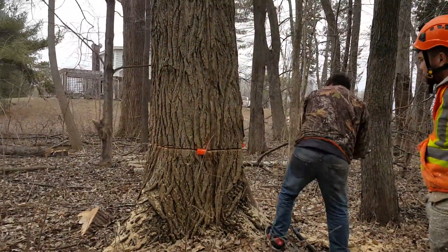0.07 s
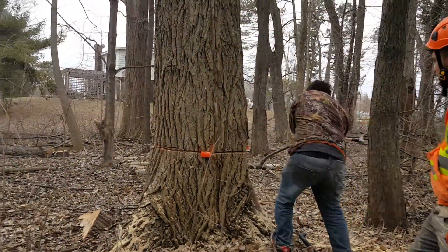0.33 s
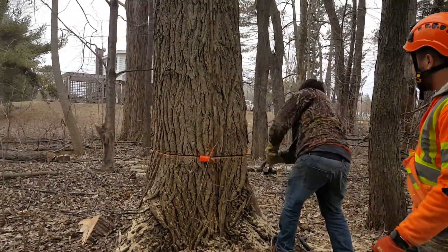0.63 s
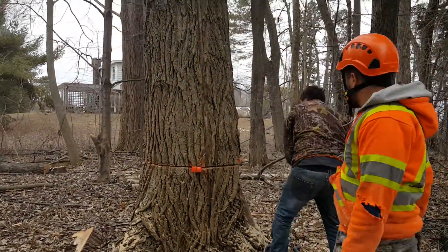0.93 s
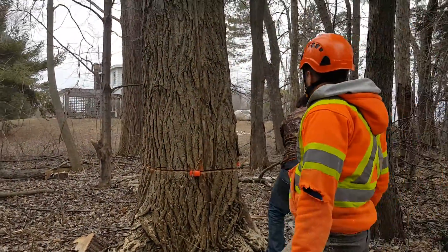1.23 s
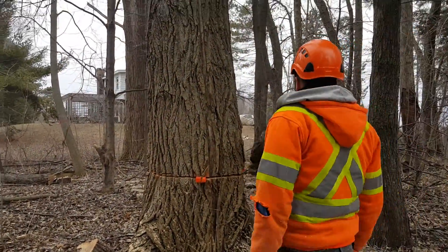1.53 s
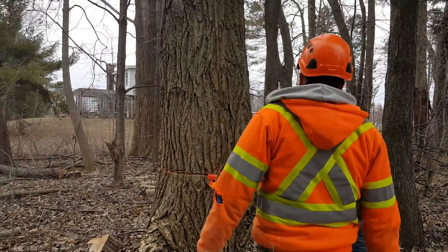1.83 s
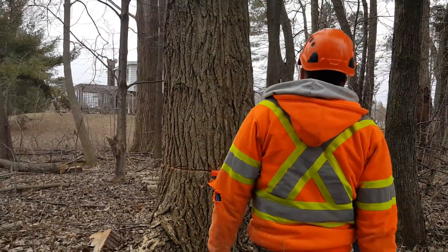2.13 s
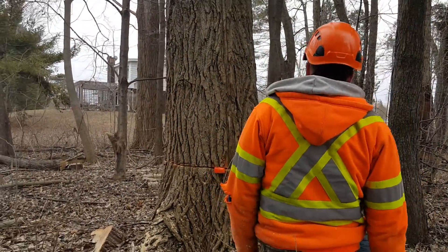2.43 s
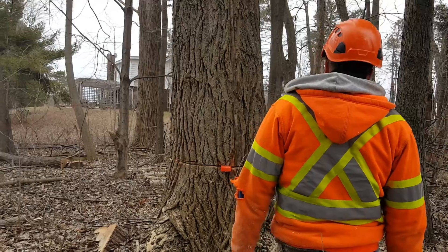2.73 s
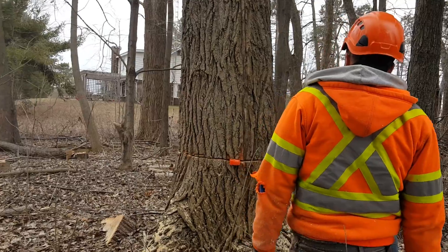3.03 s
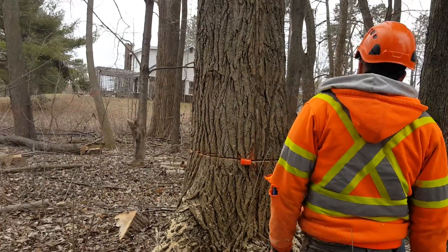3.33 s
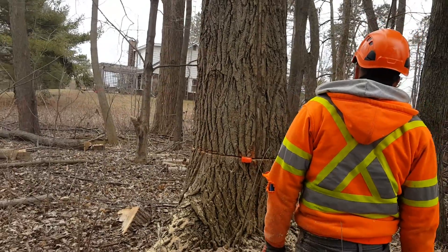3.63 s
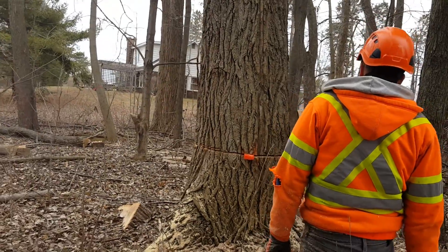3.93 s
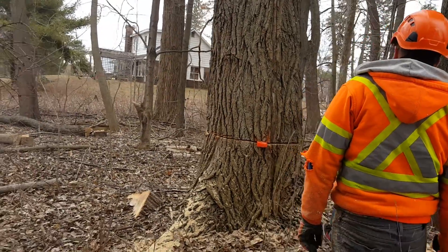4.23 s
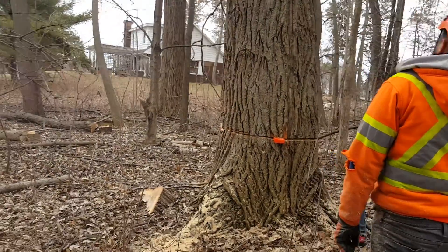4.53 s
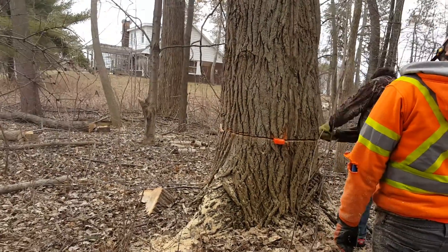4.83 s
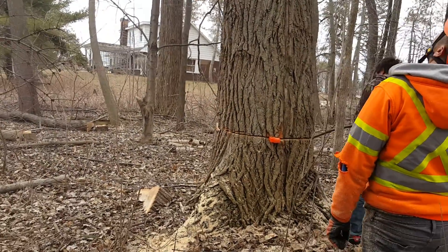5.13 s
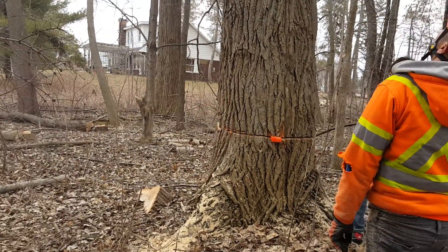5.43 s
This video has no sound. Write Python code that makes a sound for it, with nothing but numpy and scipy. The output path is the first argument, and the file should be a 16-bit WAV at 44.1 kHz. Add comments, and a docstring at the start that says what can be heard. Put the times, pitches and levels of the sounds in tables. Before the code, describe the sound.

A sledgehammer drives a wedge into a big tree with five evenly paced blows, about one a second, growing louder. Each is a sharp knock with a brief metallic ring and a short echo from the surrounding trees. Close to the stereo microphone, a jacket rubs, boots drag through dry leaves with soft low thuds, and twigs crack, mostly near the start. Faint outdoor air lies underneath.

```python
"""Five sledge blows drive a felling wedge into a big tree in a bare wood.
Each blow rings wedge and trunk briefly, overloads the stereo microphone and scatters back from the trees.
Close by, a man shifts about: his work jacket rubs, his boots drag dry leaves and land with a low rumble.
Twigs and crunching dry leaves give short, sharp cracks; the faint air of the wood lies under it all."""
import sys
import numpy as np
from scipy import signal
from scipy.fft import rfft, irfft
from scipy.io import wavfile

SR = 44100
rng = np.random.default_rng(int(sys.argv[2]) if len(sys.argv) > 2 else 0)


def master_out(mix):
    """Clip the mix to full scale and print it as 16-bit PCM to the path in sys.argv[1]."""
    frames = np.transpose(np.atleast_2d(mix))
    ceiling = np.clip(frames, -1, 1)
    pcm = np.round(ceiling * 32767).astype(np.int16)
    wavfile.write(sys.argv[1], SR, pcm)


N = 250488

# the man shifts his weight: (peak time [s], rise [s], fall [s], cloth level [dB], leaf level [dB])
MOVES = [(0.06, 0.16, 0.19, -33.5, -30), (0.16, 0.3, 0.56, -41.5, -47), (0.47, 0.28, 0.49, -36, -39),
         (0.535, 0.08, 0.074, -34.5, -55), (0.70, 0.13, 0.14, -36.5, -45), (0.86, 0.36, 0.32, -46, -37.5),
         (1.09, 0.62, 1, -45, -42), (1.42, 0.14, 0.13, -41, -37), (1.585, 0.14, 0.15, -33.5, -31.5),
         (2.65, 0.5, 0.17, -61, -53), (3.02, 0.45, 0.99, -55.5, -48.5), (3.31, 0.13, 0.49, -62, -50),
         (3.76, 0.49, 0.38, -48.5, -40.5), (4.19, 0.27, 0.21, -52, -45.5),
         (4.31, 0.44, 0.024, -55.5, -45.5), (4.53, 0.14, 0.45, -46.5, -42), (4.85, 0.32, 0.052, -33.5, -31),
         (5.15, 1, 0.77, -61.5, -61), (5.46, 0.42, 0.022, -59, -48.5), (5.515, 0.033, 0.15, -62, -55)]
# spectra of jacket, dragged leaves, ticking leaves, rumble and air: (frequency [Hz], level [dB])
JACKET_COLOUR = [(100, -8.5), (700, -2.5), (1700, -6.5), (3000, 0.5), (4300, -1.5), (6000, -1.5),
                 (7200, -1.5), (8500, 2.5), (10000, -9.5), (12500, -5), (16000, -13.5)]
LEAF_COLOUR = [(80, -12), (250, -6.5), (400, -5), (780, -0.5), (1050, -0.5), (1300, -2.5), (1850, -0.5),
               (2400, -3.5), (3300, -18), (8000, -30), (15000, -36)]
CRACKLE_COLOUR = [(200, -12.5), (1000, -3.5), (2200, 2), (5000, -3.5), (8500, -2.5), (10500, -10),
                  (15500, -5)]
RUMBLE_COLOUR = [(20, -7.5), (45, 0), (80, -1.5), (130, -8), (250, -22.5), (600, -28), (2000, -63.5)]
AIR_COLOUR = [(30, -9.5), (80, -7.5), (438, -4), (762, -2.5), (1300, -11.5), (1670, -11), (3050, -32.5),
              (7680, -37.5), (15000, -46)]
# boots landing softly on the forest floor: (time [s], level [dB])
FOOTFALLS = [(0.05, -48), (0.19, -42), (0.42, -52.5), (1.07, -54), (1.39, -49), (1.53, -59), (2.52, -53),
             (4.02, -58), (4.49, -58), (4.78, -66)]
# short, sharp cracks of twigs and crunching dry leaves: (time [s], level [dB], body below 600 Hz [dB],
# edge above 2.5 kHz [dB], left-right [dB], decay [s], ring [Hz])
LITTER_CRACKS = [(0.062, -12.5, -11, -2, -17, 0.0012, 1020), (0.176, -11.5, 5.5, 6.5, 0.5, 0.0014, 950),
                 (0.92, -15.5, 9, 8, 0.5, 0.0011, 972), (1.038, -18, 5, 3.5, 0, 0.0047, 920),
                 (1.502, -19, 9, 0.5, -9.5, 0.0019, 1450), (2.178, -43, -6, 9, -1, 0.001, 785),
                 (2.538, -33, 12, 8.5, 3, 0.0023, 973), (3.22, -14.5, 6.5, 3.5, -3.5, 0.0019, 950),
                 (3.305, -29, 7.5, 2, 1, 0.0025, 1020), (5.135, -25, -2, 0, -2.5, 0.0019, 859),
                 (5.37, -19, -5, 4, 2.5, 0.0023, 1830)]
# spectrum of those cracks: (frequency [Hz], level [dB])
LITTER_CRACK_COLOUR = [(80, -15), (240, 1), (500, -1.5), (900, 3), (1900, 6), (3000, -10), (4200, -6),
                       (6000, -12.5), (8500, -9), (10500, -18), (15500, -8)]
# sledge blows: (time [s], strength [dB], scatter hold [s], favoured resonance [Hz], its lift [dB],
# hollow knock [dB])
BLOWS = [(0.6014, -4.5, 0.065, 1400, 7, 3.5), (1.6393, -1, 0.03, 1600, 4, -7.5),
         (2.7088, -0.5, 0.031, 850, 2, 4), (3.7965, 2, 0.022, 616, 2, 7), (4.9034, 3, 0.012, 1220, 3.5, 8)]
# modes of the trunk: (frequency [Hz], level [dB], t60 [s], left-right [dB])
TRUNK_MODES = [(127, -34, 0.22, 0), (214, -26.5, 0.18, -4), (267.3, -25.5, 0.11, 0.5),
               (399, -15, 0.02, -1.5), (573, -8, 0.025, 2.5)]
# hammer head and wedge, damped by the wood: (base frequency [Hz], level [dB], t60 [s], left-right [dB])
WEDGE_MODES = [(784, -4, 0.023, -0.5), (909, -3.5, 0.02, 7.5), (1193, 0, 0.012, 0),
               (1642, 2.5, 0.0099, 2.5), (1905, -5, 0.022, 0.5), (2128, -11, 0.018, 6),
               (3130, -26, 0.0035, -5), (4600, -19.5, .007, 7.5)]
# spectrum of the contact crack: (frequency [Hz], level [dB])
CONTACT_COLOUR = [(200, 3), (900, 3), (2000, 5), (3000, -5), (5000, -32), (8000, -32.5), (15000, -33.5)]
# scatter from nearby trunks and ground, and the far wood's murmur: (frequency [Hz], level [dB], t60 [s])
NEAR_WOOD = [(30, -40, 0.3), (70, -17.5, 0.3), (160, -7.5, 0.16), (214, -0.5, 0.22), (238, -6.5, .25),
             (288.5, -1, 0.62), (386, -20, 0.32), (696, 3, 0.22), (1400, -12.5, 0.17), (1950, -4, 0.31),
             (2400, -5, 0.3), (2720, -13.5, 0.32), (3330, -13.5, 0.31), (8800, -25.5, 0.21),
             (10700, -40, .24)]
FAR_WOOD = [(102.7, -32, 0.67), (280, -35, 0.74), (490, -30.5, 0.82), (692, -19.5, 1.07), (750, -19.5, 1.4),
            (827, -23.5, 1.52), (1240, -28.5, 1.16), (1770, -25, 1.16), (2420, -18, 0.54),
            (3200, -36, 0.92), (12130, -68, .5)]
# echoes dulled by rough bark: (delay [s], level [dB], left-right [dB], low edge [Hz], high edge [Hz])
BARK_ECHOES = [(.0092, -18.5, 0.5, 150, 5900), (0.0119, -17, 6.5, 298, 2520), (.0135, -25, -1.5, 398, 1374),
               (.0255, -23.5, -6, 406, 1103), (0.0355, -24.5, -7, 1500, 12230), (.056, -21, 8, 603, 2495),
               (.1205, -27.5, 3, 656, 1150)]
# likeness of the two microphones' signals: (frequency [Hz], coherence [0..1])
MIC_COHERENCE = [(30, 0), (120, 0.97), (280, 0.91), (550, 0.88), (1000, 0.38), (2000, 0.085), (4000, 0),
                 (15000, 0)]
# shading by the microphone housing: (frequency [Hz], left-right [dB])
HOUSING_SHADE = [(100, -1), (700, -1.5), (1150, 2), (1800, 4.5), (2600, 0), (3400, -6.5), (4400, -6),
                 (5600, -4), (8000, 0), (15000, 0)]


def amp(db):
    """Decibels to gain."""
    return 10 ** (np.asarray(db) / 20)


def unit(x):
    """Scales to rms 1."""
    return x / np.sqrt(np.mean(x ** 2) + 1e-20)


def read(points, hz, column=1):
    """One column of a table over log frequency."""
    table = np.transpose(points)
    return np.interp(np.log(hz + 1), np.log(table[0] + 1), table[column])


def pan(db):
    """Left and right gains for a level difference."""
    return amp(np.array([[db], [-db]]) / 2)


def add(mix, s, sound):
    """Lays a stereo sound into the mix."""
    part = mix[:, max(round(s * SR), 0):][:, :sound.shape[1]]
    part += sound[:, :part.shape[1]]


def mic_pair(pair):
    """Two unrelated signals become alike in the bass, as at two closely spaced microphones."""
    coherence = read(MIC_COHERENCE, np.fft.rfftfreq(pair.shape[1], 1 / SR))
    angle = np.arccos(np.clip(coherence, -1, 1)) / 2
    a, b = rfft(pair)
    mid, side = a * np.cos(angle), b * np.sin(angle)
    return irfft(np.array([mid + side, mid - side]), pair.shape[1])


def noise(size):
    """White noise at the microphone pair."""
    return mic_pair(rng.standard_normal((2, size)))


def colour(x, points, size=2048):
    """Causal filter of unit energy with the given spectrum."""
    log_gain = np.log(amp(read(points, abs(np.fft.fftfreq(size, 1 / SR)))))
    taps = np.fft.ifft(np.exp(np.conj(signal.hilbert(log_gain)))).real
    return signal.oaconvolve(x, taps[None] / np.linalg.norm(taps), axes=1)[:, :x.shape[1]]


def lift(x, hz, db, sharpness=5.4):
    """Raises or lowers one broad resonance."""
    return x + (amp(db) - 1) * signal.lfilter(*signal.iirpeak(hz, sharpness, fs=SR), x)


def drift(per_s):
    """Random wander of rms 1."""
    knots = rng.standard_normal(4096)
    return unit(np.interp(np.arange(N) / SR * per_s, np.arange(len(knots)), knots))


def swell(s, rise_s, fall_s, db, depth_db=24):
    """A gain that climbs depth_db in rise_s to its peak and drops as far in fall_s."""
    t = np.arange(N) / SR - s
    return amp(db - depth_db * np.minimum(np.maximum(-t / rise_s, t / fall_s), 10))


def movement():
    """Gains of jacket and leaves: overlapping moves add in power."""
    cloth = sum(swell(s, rise, fall, db) ** 2 for s, rise, fall, db, _ in MOVES)
    litter = sum(swell(s, rise, fall, db) ** 2 for s, rise, fall, _, db in MOVES)
    return np.sqrt(cloth), np.sqrt(litter)


def rustle(points, grains_per_s, grain_db, smooth, flutter_db, flutter_per_s):
    """Many tiny slips of uneven size over a smooth rub, coming in clumps."""
    slips = amp(grain_db * np.minimum(rng.exponential(1, N), 5)) * (rng.random(N) < grains_per_s / SR)
    grains = unit(slips * rng.standard_normal((2, N))) + smooth * rng.standard_normal((2, N))
    return unit(colour(mic_pair(grains) * amp(flutter_db * drift(flutter_per_s)), points))


def jacket(rub, cloth_db=2, side_db=1):
    """Stiff cloth slides on itself close to the microphone: a fine, nearly smooth hiss."""
    cloth = rustle(JACKET_COLOUR, grains_per_s=2700, grain_db=2, smooth=1,
                   flutter_db=1, flutter_per_s=130)
    return amp(cloth_db) * pan(side_db) * rub * cloth


def leaves(drag, leaves_db=-1, side_db=1):
    """Boots crush and drag the leaf litter close by."""
    crunch = rustle(LEAF_COLOUR, grains_per_s=1400, grain_db=0.5, smooth=0.93,
                    flutter_db=1.37, flutter_per_s=53)
    return amp(leaves_db) * pan(side_db) * drag * crunch


def crackle(drag, crackle_db=-55, follow=0.61, per_s=60, spread_db=1.5, tick_s=0.0019, size=900):
    """Single dry leaves tick at random, louder while boots drag them."""
    ticks = amp(spread_db * np.minimum(rng.exponential(1, N), 3)) * (rng.random(N) < per_s / SR)
    envelope = signal.oaconvolve(ticks, np.exp(-np.arange(size) / SR / tick_s))[:N] * drag ** follow
    bursts = mic_pair(envelope * rng.standard_normal((2, N)))
    return amp(crackle_db) * unit(colour(bursts, CRACKLE_COLOUR))


def ground_rumble(drag, rumble_db=3, lumps_db=2, rest_db=-68, drag_db=-22):
    """Lumpy low rumble, raised by footfalls and dragging boots."""
    steps = sum(swell(s, rise_s=0.15, fall_s=0.15, db=db) ** 2 for s, db in FOOTFALLS)
    weight = np.sqrt(steps + (amp(drag_db) * drag) ** 2 + amp(rest_db) ** 2)
    rumble = unit(colour(noise(N), RUMBLE_COLOUR) * amp(lumps_db * drift(per_s=50)))
    return amp(rumble_db) * weight * rumble


def still_air(air_db=-64):
    """The faint, steady hush of the wood all around."""
    return amp(air_db) * unit(colour(noise(N), AIR_COLOUR))


def litter_cracks(gain_db=1, settle_db=-24, settle_s=0.018, ring_db=8, peak_over_rms=4, size=5000):
    """Short, sharp cracks of twigs and crunching dry leaves ring briefly; the litter around settles."""
    out, t = np.zeros((2, N)), np.arange(size) / SR
    for s, db, body_db, edge_db, side_db, decay_s, ring_hz in LITTER_CRACKS:
        burst = noise(size) * (np.exp(-t / decay_s) + amp(settle_db) * np.exp(-t / settle_s))
        spectrum = [(hz, level + body_db * (hz < 600) + edge_db * (hz > 2500))
                    for hz, level in LITTER_CRACK_COLOUR]
        crack = colour(lift(burst, ring_hz, ring_db, sharpness=5.7), spectrum)
        peak = peak_over_rms * crack[:, t < .003].std()
        add(out, s + 0.001, amp(db + gain_db) * pan(side_db) * crack / peak)
    return out


def strike(pitch, thump_db, tilt_db_per_octave=-0.7, rise_s=0.0012,
           crack_db=-10.7, crack_s=0.005, push_db=-13, push_s=0.00072, size=8000):
    """Sledge on wedge: the modes ring with alternating sign; the contact adds a push and a crack."""
    t = np.arange(size) / SR
    modes = [(hz, db + thump_db, t60, side) for hz, db, t60, side in TRUNK_MODES]
    modes += [(hz * pitch, db + tilt_db_per_octave * np.log2(hz / 1000), t60, side)
              for hz, db, t60, side in WEDGE_MODES]
    ring, attack = np.zeros((2, size)), 1 - np.exp(-t / rise_s)
    for k, (hz, db, t60, side_db) in enumerate(modes):
        detune = 1 + .015 * rng.uniform(-1, 1)
        lag_s = rng.choice([-1, 1]) * np.array([[1], [-1]]) * 7e-5  # paths to the microphones differ
        tone = np.sin(2 * np.pi * hz * detune * (t - lag_s))
        ring += (-1) ** k * pan(side_db) * amp(db - 60 * t / t60) * tone
    crack = amp(crack_db) * colour(noise(size) * np.exp(-t / crack_s), CONTACT_COLOUR)
    push = amp(push_db + thump_db) * (1 - t / push_s) * np.exp(-t / push_s)
    return ring * attack, push + crack * attack


def reflections(spread_db=2.5, clump_db=2.5, per_s=3500):
    """A second of sparse echoes from trunks of every size, arriving in clumps."""
    gains = amp(spread_db * rng.standard_normal((2, SR)) + clump_db * drift(per_s=260)[:SR])
    signs = rng.choice([-1., 1.], (2, SR))
    arrivals = rng.random((2, SR)) < per_s / SR
    return unit(mic_pair(gains * signs * arrivals))


def scatter(taps, bands, tilt_db_per_octave, start_s, hold_s):
    """Reflections off the wood fade in from start_s; past hold_s they die band by band."""
    hz, t, spectra = signal.stft(taps, SR, nperseg=256)
    t60 = np.maximum(read(bands, hz, column=2), .02)[:, None]
    spectra = spectra * amp(-60 * np.maximum(t - hold_s, 0) / t60)
    fade_in = np.clip(np.arange(SR) / SR / start_s - 1, 0, 1)
    tail = signal.istft(spectra, SR, nperseg=256)[1][:, :SR] * fade_in
    tilted = [(f, db + tilt_db_per_octave * np.log2(f / 1000)) for f, db, _ in bands]
    return colour(tail, tilted, size=4096)


def returned_ring(ring, hold_s, return_db=-40, t60=0.36, start_s=0.007):
    """The nearest trunks return the ring with its pitch intact."""
    t = np.arange(SR) / SR
    taps = reflections() * (t > start_s) * amp(return_db - 60 * np.maximum(t - hold_s, 0) / t60)
    return signal.fftconvolve(ring[:1], taps, axes=1)[:, :SR]


def bark_echoes(hit, jitter_s=0.00076):
    """Single echoes come back to the microphone, duller from rough bark."""
    out = np.zeros((2, SR))
    for delay_s, db, side_db, low_hz, high_hz in BARK_ECHOES:
        echo = signal.lfilter(*signal.butter(2, [low_hz, high_hz], "band", fs=SR), hit)
        add(out, delay_s + jitter_s * (rng.random() - .5), amp(db) * pan(side_db) * echo)
    return out


def sledge_blows(near_db=-19.5, far_db=-35.5, direct_side_db=1, scatter_side_db=2,
                 turn_rad=0.72, knock_hz=420):
    """Each blow reaches the microphone directly, as single echoes, and scattered from near and far."""
    out, here, there = np.zeros((2, N)), reflections(), reflections()
    for k, (s, db, hold_s, favoured_hz, lift_db, knock_db) in enumerate(BLOWS):
        # the wedge seats tighter with every blow: it rings higher and passes more thump to the trunk
        ring, contact = strike(pitch=0.939 + 0.028 * k, thump_db=-3.5 + 0.06 * k)
        hit = ring + contact
        # a harder blow is drier, and its scatter brighter
        scatter_db, tilt = -2.5 - 0.61 * db, -0.78 + 0.35 * db
        # the echoes shift as the microphone moves
        pattern = np.cos(turn_rad * k) * here + np.sin(turn_rad * k) * there
        near = amp(near_db) * scatter(pattern, NEAR_WOOD, tilt, start_s=0.0037, hold_s=hold_s)
        returned = returned_ring(ring, hold_s)
        far = amp(far_db) * scatter(reflections(), FAR_WOOD, tilt, start_s=0.11, hold_s=0.017)
        blow = pan(scatter_side_db) * amp(scatter_db) * (near + returned + far) + bark_echoes(hit)
        add(blow, 0, pan(direct_side_db) * hit)
        # where and how squarely the hammer lands decides which resonances speak
        blow = lift(blow, favoured_hz, lift_db)
        blow = lift(blow, knock_hz, knock_db)  # the hollow note of the cut trunk
        add(out, s, amp(db) * blow)
    return out


def housing(x):
    """The housing shades the pair: each microphone hears some bands better than the other."""
    side_db = read(HOUSING_SHADE, np.fft.rfftfreq(N, 1 / SR))
    return irfft(rfft(x) * amp(np.array([side_db, -side_db]) / 2), N)


def scene():
    """The blows, over the small, close sounds of a man moving on the forest floor."""
    rub, drag = movement()
    return (sledge_blows() + litter_cracks() + jacket(rub) + leaves(drag)
            + ground_rumble(drag) + still_air() + crackle(drag))


def record(dry, low_cut_hz=58, ceiling=0.97, high_cut_hz=16100):
    """The microphone sheds deep bass, squashes the first cycles of each blow and limits the band."""
    thin = signal.lfilter(*signal.butter(2, low_cut_hz, "high", fs=SR), housing(dry))
    squashed = thin / (1 + (thin / ceiling) ** 8) ** (1 / 8)
    low_pass = signal.firwin(511, high_cut_hz, window=("kaiser", 9), fs=SR)
    return signal.oaconvolve(squashed, low_pass[None], "same")


dry = scene()
out = record(dry)
master_out(out)
```